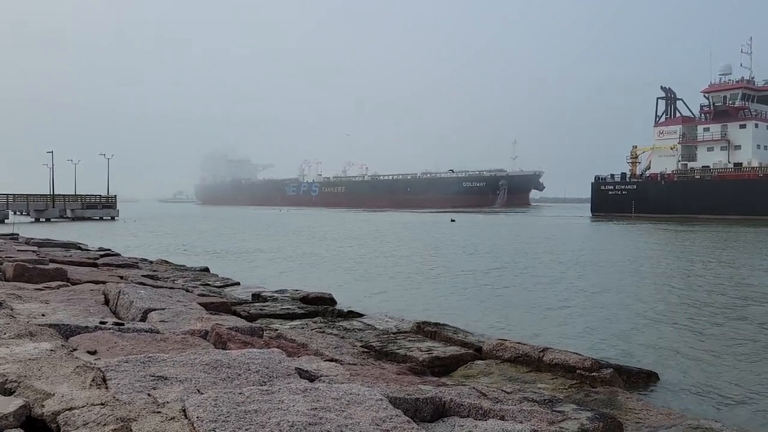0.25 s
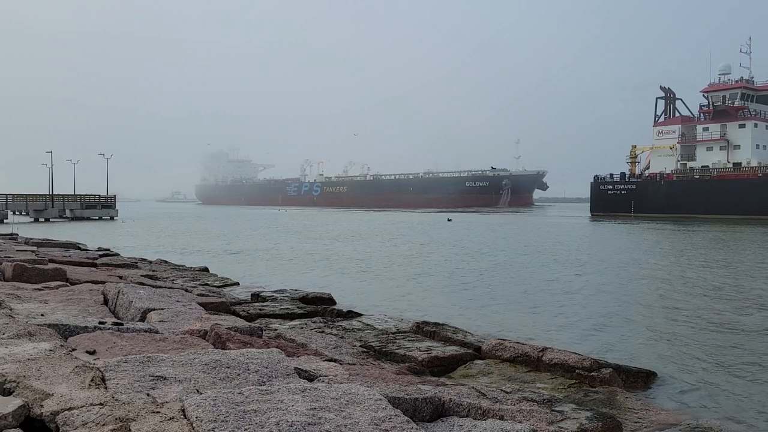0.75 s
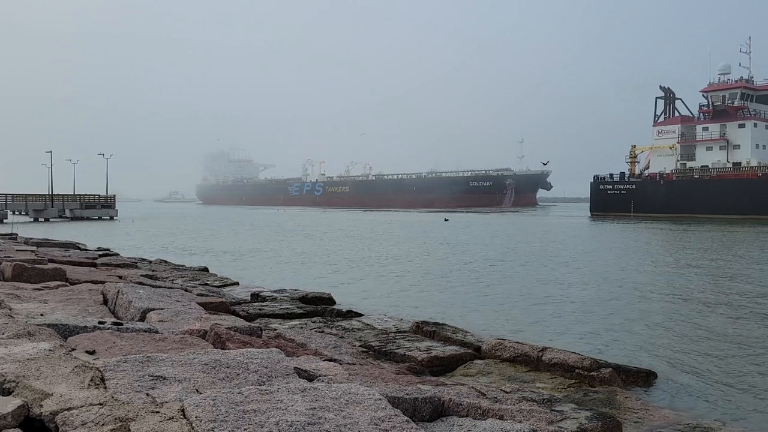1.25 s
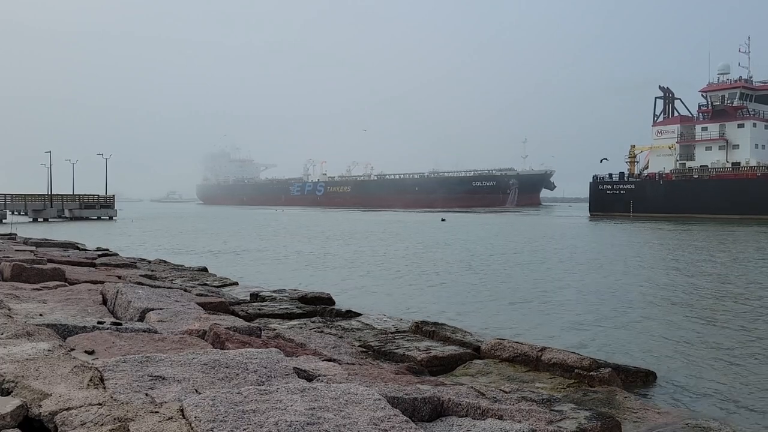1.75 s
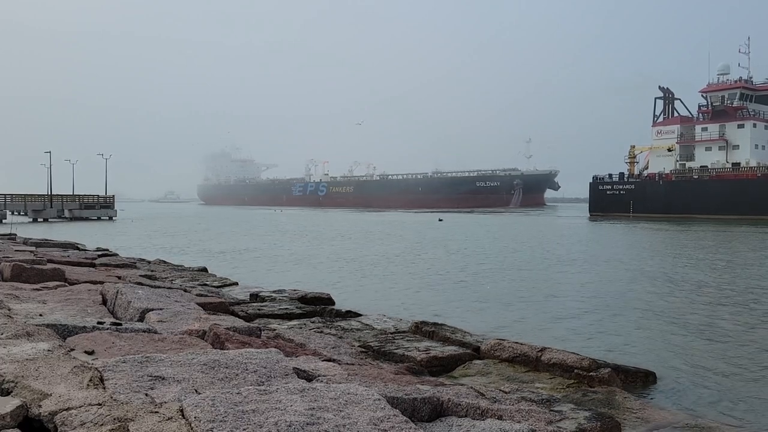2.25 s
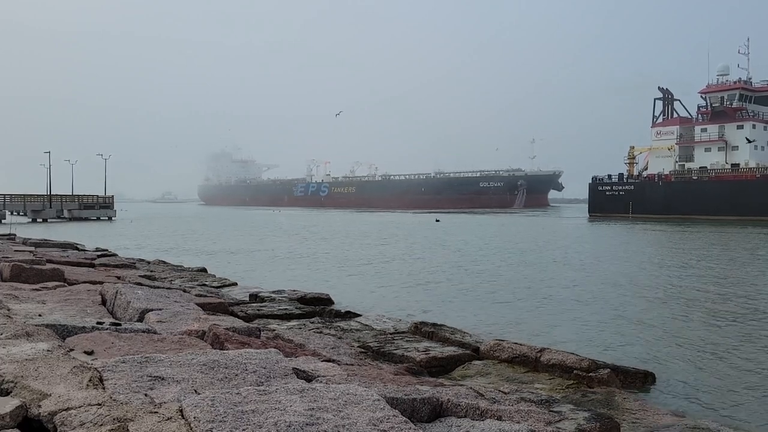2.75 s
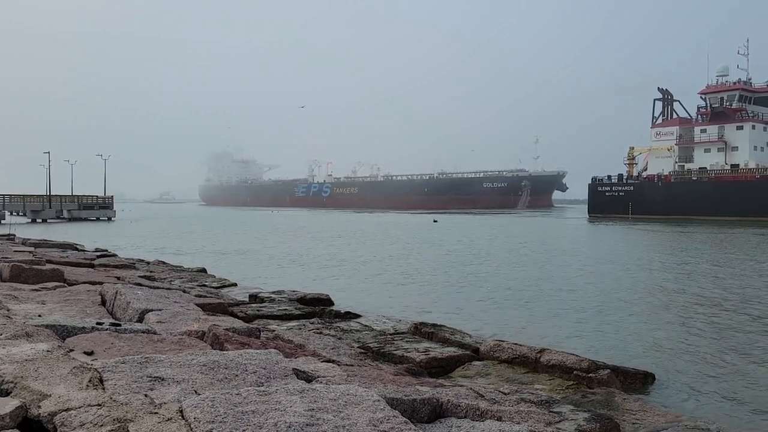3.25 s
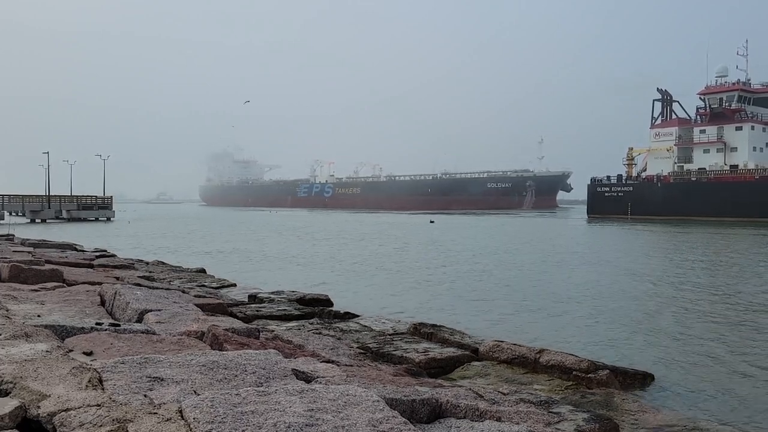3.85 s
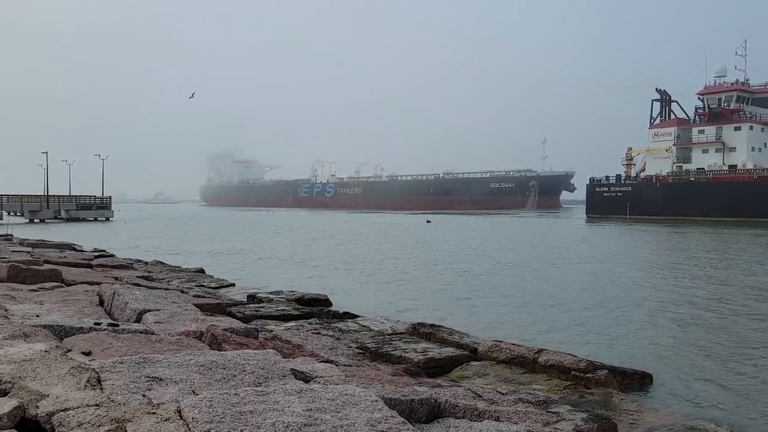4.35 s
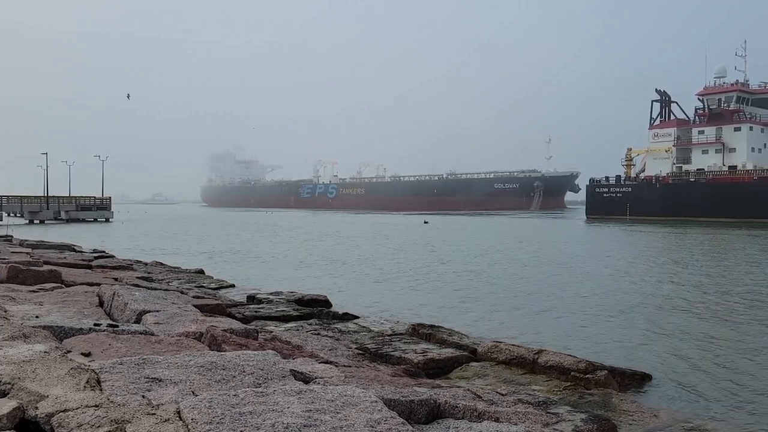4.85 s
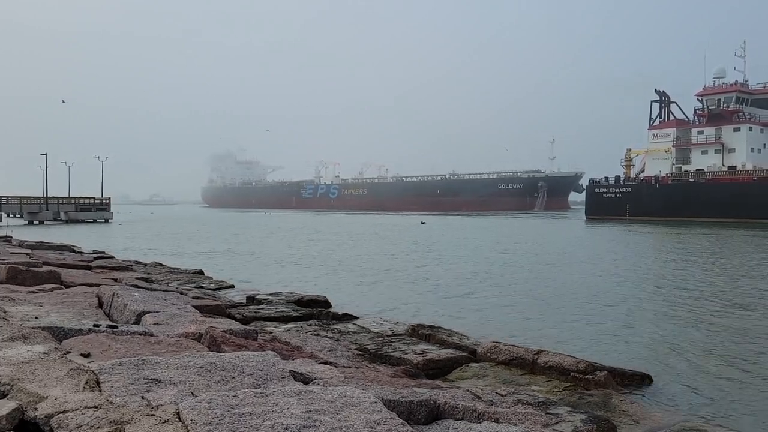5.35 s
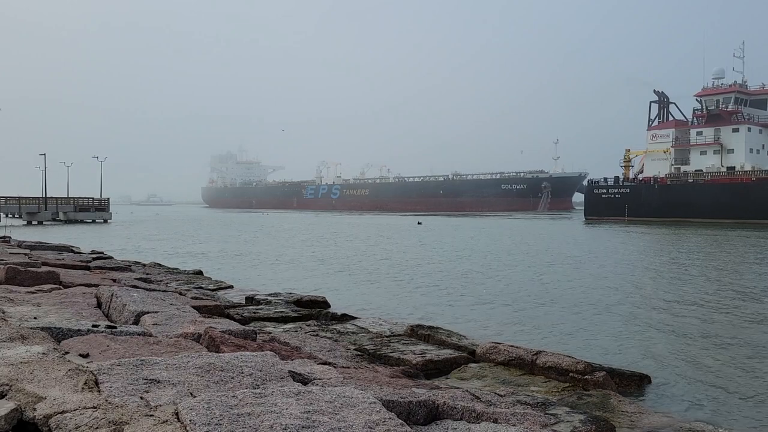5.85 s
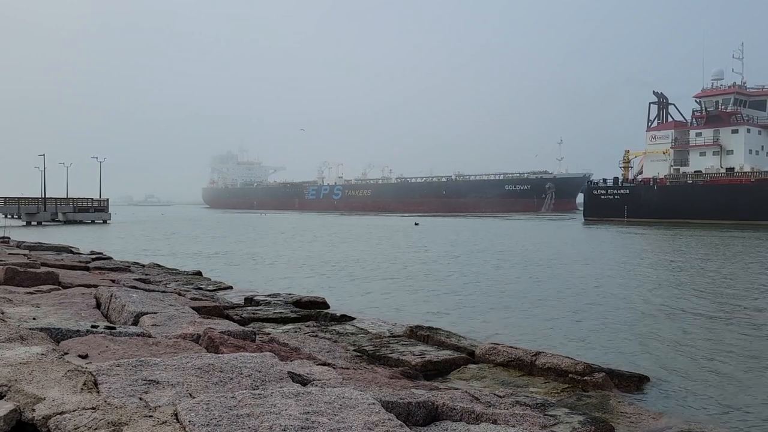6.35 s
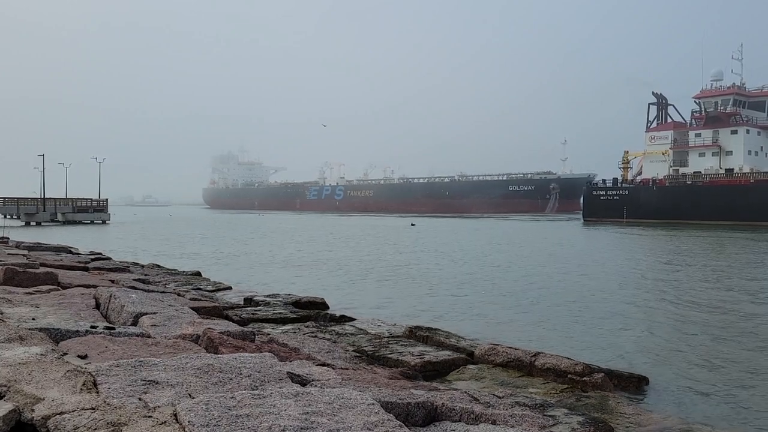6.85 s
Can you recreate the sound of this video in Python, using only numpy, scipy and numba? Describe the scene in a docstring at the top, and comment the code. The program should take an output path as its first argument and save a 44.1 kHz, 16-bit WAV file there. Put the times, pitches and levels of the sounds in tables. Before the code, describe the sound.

Outdoors on a rocky shore by a foggy waterway, low wind rumble buffets the microphone over a faint distant water wash. After about a second a tiny hiss of air leads into one loud, deep, brassy ship's horn blast, held on a steady pitch for nearly five seconds. It stops quickly, and soft, low echoes return from the banks and fade beneath gusty rumbling.

```python
"""Ship's horn across foggy water

A ship's air horn sounds one long blast over the water, heard by a camera on a rock jetty.
The horn is a sum of overtones; moving air scatters each one, so they fade in and out.
A short hiss of air leads the blast, and decaying tones return from the banks after it.
Wind on the microphone ports (low rumble, lighter flutter) and a distant harbour wash are banded noise.
The camera's gain control ducks under the blast and creeps back slowly."""
import sys
import numpy as np
from scipy import signal
from scipy.fft import rfft, irfft, next_fast_len
from scipy.io import wavfile
from scipy.ndimage import uniform_filter1d
from numba import njit

SR = 44100
rng = np.random.default_rng(int(sys.argv[2]) if len(sys.argv) > 2 else 0)


def master_out(mix):
    """Clip the mix to full scale and print it as 16-bit PCM to the path in sys.argv[1]."""
    frames = np.transpose(np.atleast_2d(mix))
    ceiling = np.clip(frames, -1, 1)
    pcm = np.round(ceiling * 32767).astype(np.int16)
    wavfile.write(sys.argv[1], SR, pcm)


N = 313410  # samples

# first overtone of each group, and the end of the last [overtone number, fundamental = 1]
GROUPS = [1, 2, 3, 4, 5, 6, 8, 25, 110]
# low overtones from the horn bell; levels count only within a group: (overtone number,
# level [dB], left minus right [dB], left lead [rad], scattered against direct sound [dB])
LOW_OVERTONES = [(1, 0, -1.1, 0.16, -24.5), (2, 0, -1.5, 0.29, -13), (3, 0, -8.5, -1.3, -6.5),
                 (4, 0, -11.5, 1.6, -23.5), (5, -9, 0, -1.4, -9.5), (6, -15, -0.5, 2.1, -9),
                 (7, -26.5, -9, -0.93, -5), (8, -28.5, 4, -1.62, 1.5)]

STEADY_HZ = 133.72
CATCH_S, FIRST_PULSE_S, SHUT_S = .9805, .984, 5.697  # diaphragm catches, first pulse, valve shuts
SOUNDING_S = (.92, 5.88)  # span in which the overtones are computed
HOP = 64  # samples between overtone strengths
SIDE = np.array([[.5], [-.5]])  # half of a left-minus-right difference to each port


def undb(db):
    """Decibels to an amplitude factor."""
    return 10 ** (np.asarray(db) / 20)


def curves(table):
    """Columns of a table joined in time, one value a sample."""
    s, *columns = np.transpose(table)
    t = np.arange(N) / SR
    return [np.interp(t, s, column) for column in columns]


def shape(table, hz):
    """Second column of a table, joined along log frequency."""
    table = np.array(table)
    return np.interp(np.log(hz), np.log(table[:, 0]), table[:, 1])


def walk(rate):
    """Random levels held 1 / rate s and slewed twice; spread near 1."""
    k = int(SR / rate)
    steps = np.repeat(rng.standard_normal(N // k + 2), k)
    slewed = uniform_filter1d(uniform_filter1d(steps, k), k)
    return 1.53 * slewed[k // 2:N + k // 2]


def noise_bands(table, alike, flicker_db, rate, lag_s=0.):
    """Stereo noise in half-octave bands that flicker alone; alike(hz) is the share common to both ports."""
    size = next_fast_len(N)
    hz = np.arange(1, size // 2 + 2) * SR / size
    low_hz, high_hz = table[0][0], table[-1][0]
    colour = undb(shape(table, hz)) * (hz > low_hz) * (hz < high_hz)
    common, left, right = (rfft(rng.standard_normal(size)) for _ in range(3))
    share = np.clip(alike(hz), 0, 1)
    # the common part reaches the left port lag_s later
    delayed = np.array([np.exp(-2j * np.pi * hz * lag_s), hz ** 0])
    pair = np.sqrt(share) * common * delayed + np.sqrt(1 - share) * np.array([left, right])
    out = 0
    for centre in np.arange(np.log2(low_hz), np.log2(high_hz) + .5, .5):
        window = np.sqrt(np.clip(1 - 2 * abs(np.log2(hz) - centre), 0, 1))
        band = irfft(pair * colour * window, size)[:, :N]
        out = out + undb(flicker_db * walk(rate)) * band
    return out / np.sqrt(np.mean(out.mean(axis=0) ** 2))  # unit RMS of the two ports' mean


def wash():
    """Far engines and lapping water, right port first; broad noise with a slow swell and a quick grain."""
    # colour of the distant wash: (frequency [Hz], density [dB per Hz])
    wash_colour = [(250, -20.5), (350, -4.5), (430, -11), (500, -3.5), (680, -5), (800, 0.5), (1100, -5),
                   (1450, -4.5), (2000, -12), (3000, -19), (4700, -31.5), (7000, -32.5), (10000, -41),
                   (13000, -38), (15700, -47)]
    level_db, left_lag_s = -45, .00045  # level ahead of the gain control
    grain_db = 0.8 * walk(1.7) + 1.0 * walk(40)
    noise = noise_bands(wash_colour, lambda hz: .6 - hz / 30000, 0.5, 18, left_lag_s)
    return undb(level_db + grain_db) * noise


def wind():
    """Eddies shaken off the camera body: a low rumble, with lighter flutter in gusts."""
    # wind on the microphone ports, ahead of buffets and gain control:
    # (time [s], rumble level [dB], flutter level [dB])
    gusts = [(0, -32.5, -48), (.25, -34, -43), (.4, -37, -48), (.95, -35, -43.5), (1.13, -39, -37),
             (1.28, -26, -31), (1.55, -26, -33.5), (1.95, -26.5, -36), (2.5, -30, -37.5), (3.2, -30.5, -35),
             (3.7, -32.5, -38.5), (4.8, -33.5, -38.5), (5.6, -33.5, -39), (5.95, -26, -39),
             (6.28, -29, -39), (6.45, -23.5, -43), (6.75, -27.5, -41.5), (6.87, -37.5, -47),
             (7.11, -26, -46)]
    # sharper buffets: (time [s], rumble rise [dB], flutter rise [dB])
    buffets = [(.24, 2, 5), (.62, 3, 3), (.94, 3, 4.5), (1.42, 1, 5.5), (1.54, 0, 7), (2.0, 5, 5),
               (2.63, 0.5, 8.5), (3.07, 5.5, 4.5), (3.23, 0, 6), (3.76, -2, 6.5), (4.95, 4.5, 3.5),
               (6.61, -2, 12.5), (6.74, 4, 8), (6.82, 5, 11.5)]
    # colour of the rumble: (frequency [Hz], density [dB per Hz])
    rumble_colour = [(22, -26.5), (32, -22), (40, 3.5), (52, -7), (70, 0.5), (105, -4.5)]
    # colour of the flutter: (frequency [Hz], density [dB per Hz])
    flutter_colour = [(120, 0), (170, -4.5), (240, -9), (340, -13.5), (480, -25)]
    buffet_s, lump_db, lump_hz, left_minus_right_db = .035, 1, 13, -1

    s, rumble_rise, flutter_rise = np.transpose(buffets)[:, :, None]
    bump = np.exp(-((np.arange(N) / SR - s) / buffet_s) ** 2)
    lumps = lump_db * walk(lump_hz)  # shared by rumble and flutter
    rumble_db, flutter_db = curves(gusts)
    rumble_db = rumble_db + lumps + np.sum(rumble_rise * bump, axis=0)
    flutter_db = flutter_db + lumps + np.sum(flutter_rise * bump, axis=0)
    rumble = noise_bands(rumble_colour, lambda hz: 0.67 + 0 * hz, 3.3, 5.3)
    flutter = noise_bands(flutter_colour, lambda hz: 0.27 + 0 * hz, 2.4, 22)
    buffeting = undb(rumble_db) * rumble + undb(flutter_db) * flutter
    return buffeting * undb(left_minus_right_db * SIDE)


def echoes(fade_s=0.024):
    """The steady pitch returns from the banks as six overtones, brought in as the direct blast dies."""
    # travel delay of each bank's echo [s]; the second and third are half an octave-wave apart,
    # so the octave cancels until one ends
    delays = [.1346, .301, .4861, .89, 1.6]
    # each bank: (fundamental [dB], octave [dB], third overtone [dB], smear of its end [s])
    banks = [(-21.5, -44, -53, .06), (-30, -29.5, -45, .16), (-28.5, -29, -47.5, .04),
             (-43, -65, -49.5, 0.11), (-47.5, -44, -52, .1)]
    t = np.arange(N) / SR
    out = np.zeros((2, N))
    delay = np.array(delays)[:, None]
    first_db, octave_db, third_db, smear_s = np.transpose(banks)[:, :, None]
    lasting = .5 - .5 * np.tanh(2 * (t - SHUT_S - .02 - delay) / smear_s)
    levels = [first_db, octave_db, third_db, third_db - 11, third_db - 11.5, third_db - 10]
    for k, db in enumerate(levels, 1):
        arrival = np.exp(-2j * np.pi * k * STEADY_HZ * delay)
        back = np.sum(undb(db) * lasting * arrival, axis=0)
        for c in range(2):
            sway = 0.3 * k * walk(3)  # rad
            tone = np.exp(2j * np.pi * k * STEADY_HZ * t + 1j * sway)
            flicker = undb((1.2 + .7 * k) * walk(11))
            out[c] += flicker * np.sqrt(2) * (back * tone).imag
    return out * np.clip((t - SHUT_S - .06) / fade_s + 1, 0, 1)


def air():
    """Air rushing through the horn before the diaphragm catches: a brief hiss."""
    # colour of the hiss: (frequency [Hz], density [dB per Hz])
    hiss_colour = [(600, -12.5), (1200, 4.5), (2600, -1), (4200, -25)]
    start_s, level_db, rise_s, fall_s = 0.913, -42.5, 0.023, 0.018
    t = np.arange(N) / SR
    flow = np.clip((t - start_s) / rise_s, 0, 1) * np.exp(-np.clip(t - CATCH_S, 0, None) / fall_s)
    return undb(level_db) * flow * noise_bands(hiss_colour, lambda hz: 0.44 + 0 * hz, 2.2, 30)


def pitch():
    """Fundamental [Hz]: starts flat, settles on the steady note, sags as the valve shuts."""
    start_flat_hz, settle_s, sag_hz_per_s = 3.3, .03, 160
    t = np.arange(N) / SR
    flat = start_flat_hz * np.exp(-np.clip(t - CATCH_S, -.01, None) / settle_s)
    sag = sag_hz_per_s * np.clip(t - SHUT_S + 0.0093, 0, .1)
    return STEADY_HZ - flat - sag


def overtones():
    """Complex strength of every overtone at each port; sine phases make a steep-fronted wave."""
    # horn bell above the low overtones, ahead of the joining offset: (frequency [Hz], level [dB])
    high = [(680, -29), (1150, 1), (1560, -2.5), (2060, 1), (2600, -10.5), (2960, -9.5), (3390, -19.5),
            (4560, -24), (6410, -26.5), (10400, -47), (11400, -50.5), (13000, -47.5), (14500, -50.5)]
    # balance of the ports above the low overtones: (frequency [Hz], left minus right [dB])
    pan = [(1200, -6), (2400, -.5), (4400, 4.5), (8000, 0), (15000, -1.5)]
    join_db, left_lag_s = -27.5, 0.00011
    k = np.arange(1, GROUPS[-1])
    hz = k * STEADY_HZ
    db = join_db + shape(high, hz)
    pan_db = shape(pan, hz)
    lead = -2 * np.pi * hz * left_lag_s
    low = len(LOW_OVERTONES)
    db[:low], pan_db[:low], lead[:low] = np.transpose(LOW_OVERTONES)[1:4]
    return k, hz, -1j * undb(db + SIDE * pan_db) * np.exp(1j * SIDE * lead)


def group_db(s):
    """Level of each overtone group: steep rise, slow drift, a fall that speeds up."""
    # overtone groups: (held level [dB], rise before the catch [dB per s], loss 50 ms after shutting [dB])
    voice = [(-14, 701.5, 9), (-13.5, 1801.5, 23), (-31, 1305, 8), (-29, 1600, 28), (-27, 1700, 20),
             (-35, 2200, 28), (-29, 3002, 32), (-49, 2602, 47)]
    # slow drift over the water: (time [s], fundamental against octave [dB], overtone 3 [dB],
    # overtone 4 [dB], overtone 5 [dB], overtones from 8 [dB])
    blast = [(1.03, -1, -4, 0.5, 5, 1.5), (1.2, -1, -11, -2.5, 3.5, 0.5), (1.48, -1.5, -4.5, 0.5, 0, -3),
             (2.0, -2, -10.5, 0.5, 1, 3.5), (2.3, 0.5, -2.5, 1.5, 1, 0.5), (2.76, 0.5, 2, -5.5, 3.5, -2.5),
             (3.2, -2, 0.5, -3, -3.5, -1.5), (3.45, -2, -9.5, -2.5, -4.5, -1.5),
             (3.65, -2.5, 0, -6, -6, -1), (3.91, -4, 1, -5, -3.5, -5.5), (4.25, -3, 3, 1, 1, -0.5),
             (4.6, -1.5, -1, 4, 3, -2), (4.91, -2, -1.5, 5, 0.5, -0.5), (5.33, -2, -1, 2.5, 1.5, 0.5),
             (5.65, -2, -2.5, 1.5, -1, 1.5)]
    # swells of overtones 6-7: (time [s], width [s], level [dB])
    swells = [(2.5, 0.68, 9), (4.55, 0.28, 4.5)]
    octave_share = 0.38  # of the drift between fundamental and octave
    fundamental_late_db, treble_late_db, full_swing_s = 5.5, 2, 0.063
    shut_rasp_db, shut_rasp_s = 3.5, 0.062  # treble swells around the shutting

    held, rise, loss = np.transpose(voice)[:, :, None]
    times, *columns = np.transpose(blast)
    balance, third, fourth, fifth, upper = (np.interp(s, times, c) for c in columns)
    swell = sum(db * np.exp(-((s - at) / width) ** 2) for at, width, db in swells)
    drift = np.array([(1 - octave_share) * balance, -octave_share * balance,
                      third, fourth, fifth, swell, upper, upper])
    rising = rise * np.clip(CATCH_S - s, 0, None)
    falling = loss * (np.clip(s - SHUT_S, 0, None) / .05) ** 2
    db = held + drift - rising - falling
    growing = np.exp(-np.clip(s - CATCH_S, 0, None) / full_swing_s)
    db[0] -= fundamental_late_db * growing
    db[-1] += shut_rasp_db * np.exp(-((s - SHUT_S) / shut_rasp_s) ** 2) - treble_late_db * growing
    return db


def eddies(hz, count):
    """Complex fading of unit power for every overtone, quicker for the higher; neighbours somewhat alike."""
    fade_hz_per_khz = 1.31
    noise = rng.standard_normal((len(hz), count)) + 1j * rng.standard_normal((len(hz), count))
    noise = noise + 0.31 * np.roll(noise, 1, axis=0)
    swing = np.fft.fftfreq(count, HOP / SR) / (fade_hz_per_khz * hz[:, None] / 1000)
    fade = np.fft.ifft(noise / (1 + swing ** 2) ** 1.01, axis=1)
    return fade / np.sqrt(np.mean(abs(fade) ** 2, axis=1, keepdims=True))


@njit
def play(strength, turns, hop):
    """Sum of overtones on the running phase; strength (step, overtone) is joined between steps."""
    out = np.zeros(len(turns))
    for i in range(len(turns)):
        j, part = i // hop, (i % hop) / hop
        turn = np.exp(2j * np.pi * turns[i])
        z = turn
        for k in range(strength.shape[1]):
            now = strength[j, k] + part * (strength[j + 1, k] - strength[j, k])
            out[i] += (z * now).real
            z *= turn
    return out


def horn():
    """Every overtone is a direct part plus a part scattered by eddies in the air, fading at random."""
    # likeness of the fading at the two ports: (frequency [Hz], common share [0-1])
    scatter_alike = [(400, 0.35), (1000, 1), (4000, 0.26), (8000, 0.73), (14000, .1)]
    scatter_db, build_s = 2, 0.03  # scattered against direct sound, above the low overtones
    at_once = 0.63  # share of the scattered sound that arrives with the first pulse

    k, hz, strength = overtones()
    sounding = slice(int(SOUNDING_S[0] * SR), int(SOUNDING_S[1] * SR))
    turns = np.cumsum(pitch()) / SR
    turns = (turns - turns[int(FIRST_PULSE_S * SR)])[sounding]
    s = SOUNDING_S[0] + np.arange(len(turns) // HOP + 2) * HOP / SR
    scatter = np.full((len(k), 1), undb(scatter_db))
    # the low overtones have shares of their own
    scatter[:len(LOW_OVERTONES), 0] = undb(np.array(LOW_OVERTONES)[:, 4])
    # scattered paths are longer, so the first pulses arrive cleaner
    arrived = 1 - (1 - at_once) * np.exp(-np.clip(s - CATCH_S, 0, None) / build_s)

    gain = np.empty((len(k), len(s)))
    for low, high, db in zip(GROUPS, GROUPS[1:], group_db(s)):
        group = slice(low - 1, high - 1)
        power = np.sum(abs(strength[:, group].mean(axis=0)) ** 2) / 2
        gain[group] = undb(db) / np.sqrt(power)
    gain /= np.sqrt(1 + (scatter * arrived) ** 2)  # scattering leaves the mean power alone

    alike = np.clip(shape(scatter_alike, hz), 0, 1)[:, None]
    common = eddies(hz, count=len(s))
    out = np.zeros((2, N))
    for c in range(2):
        fade = np.sqrt(alike) * common + np.sqrt(1 - alike) * eddies(hz, count=len(s))
        heard = strength[c][:, None] * gain * (1 + scatter * arrived * fade)
        out[c, sounding] = play(np.ascontiguousarray(heard.T), turns, HOP)
    return out


def scene():
    """Wash and wind at the jetty, the banks' echoes, and the horn across the water."""
    return wash() + wind() + echoes() + air() + horn()


@njit
def follow(want_db, fall, rise):
    """Gain drops quickly and creeps back slowly."""
    out, g = np.empty(len(want_db)), want_db[0]
    for i in range(len(want_db)):
        g += (want_db[i] - g) * (fall if want_db[i] < g else rise)
        out[i] = g
    return out


def record(dry):
    """Camera: gain control on the 26 ms loudness, tall peaks rounded, then the top is cut."""
    loud_from_db, ratio, most_gain_db = -9, 2.6, 7
    attack_s, release_s = 0.05, 18
    ceiling, top_hz = .97, 15720
    power = uniform_filter1d(np.mean(dry ** 2, axis=0), int(0.026 * SR))
    loud_db = 10 * np.log10(power + 1e-12)
    want_db = np.minimum((loud_from_db - loud_db) * (1 - 1 / ratio), most_gain_db)
    gain = undb(follow(want_db, 1 / (attack_s * SR), 1 / (release_s * SR)))
    x = dry * gain / ceiling
    rounded = ceiling * x / (1 + x ** 6) ** (1 / 6)
    top_cut = signal.ellip(8, .2, 70, top_hz, fs=SR, output="sos")
    return signal.sosfilt(top_cut, rounded)


dry = scene()
out = record(dry)
master_out(out)
```